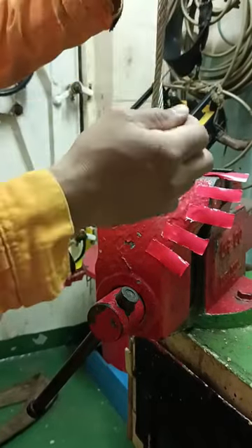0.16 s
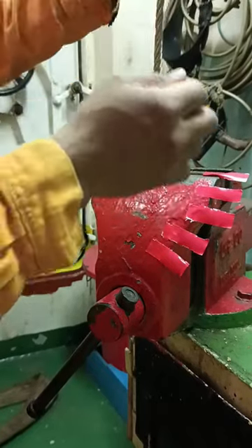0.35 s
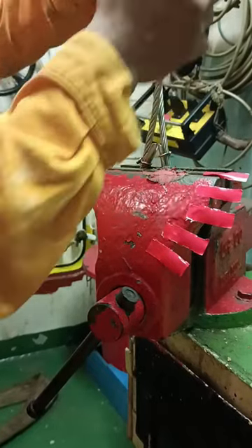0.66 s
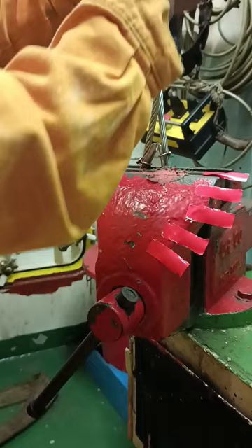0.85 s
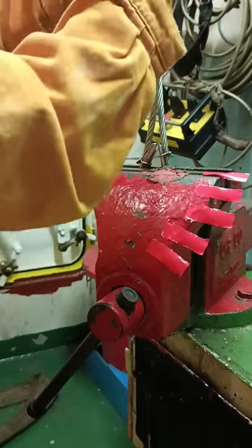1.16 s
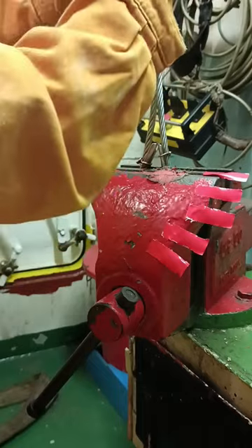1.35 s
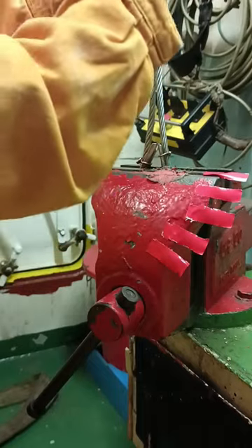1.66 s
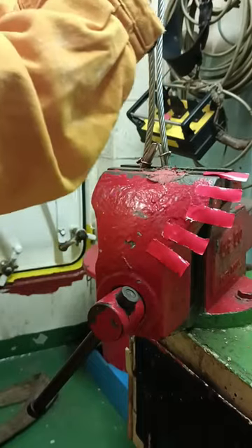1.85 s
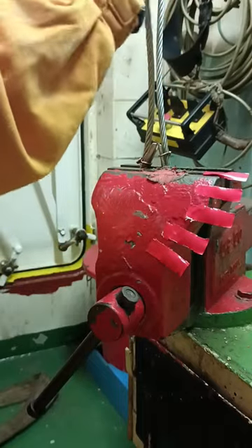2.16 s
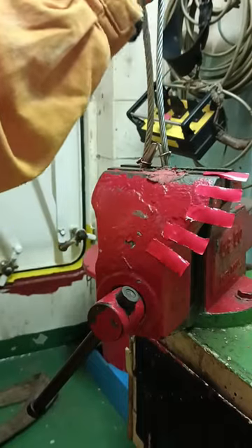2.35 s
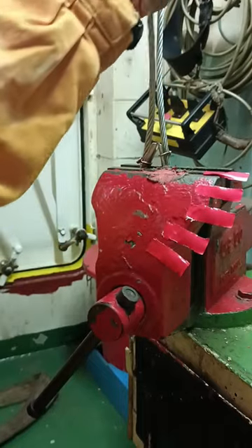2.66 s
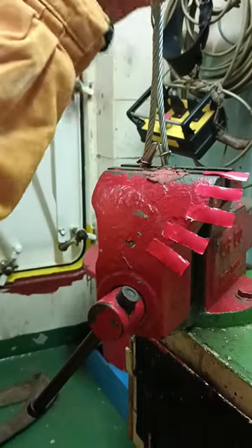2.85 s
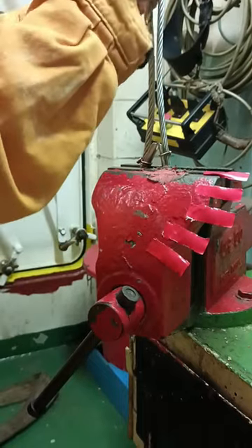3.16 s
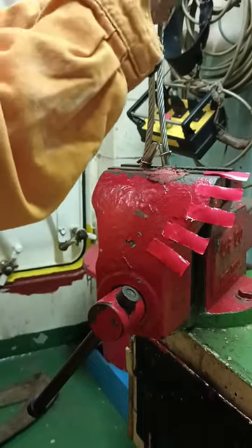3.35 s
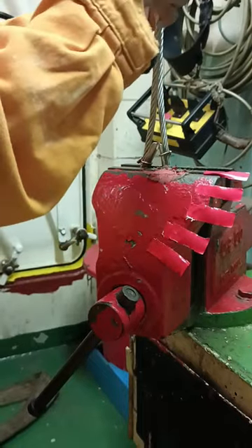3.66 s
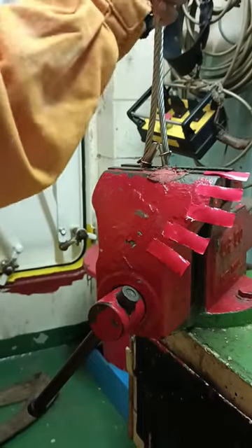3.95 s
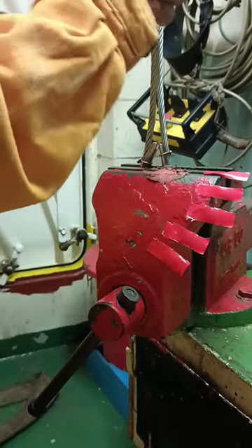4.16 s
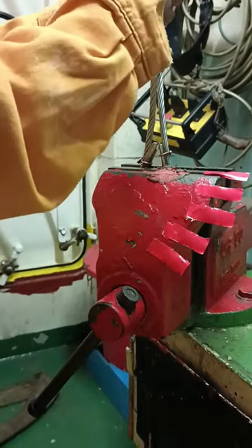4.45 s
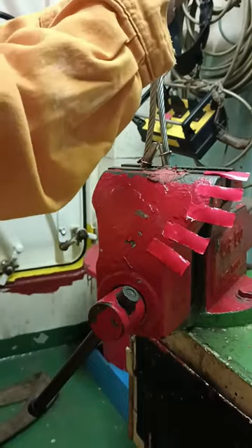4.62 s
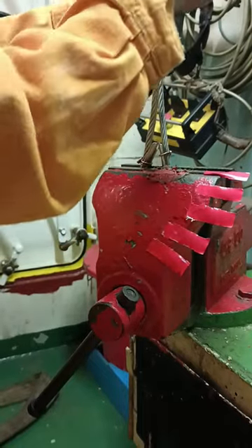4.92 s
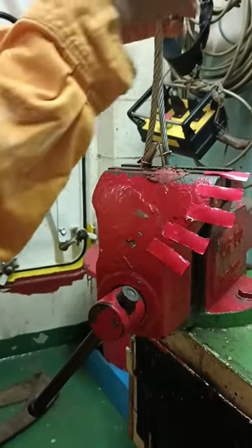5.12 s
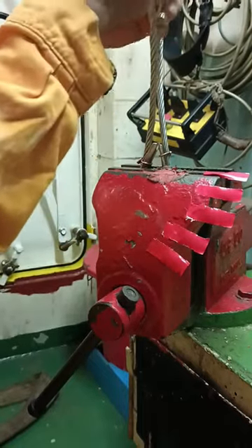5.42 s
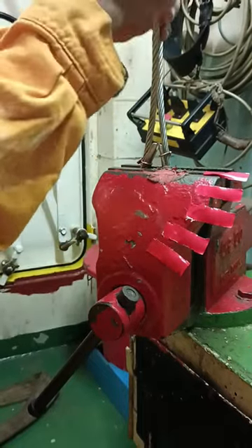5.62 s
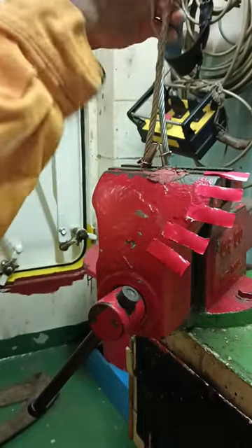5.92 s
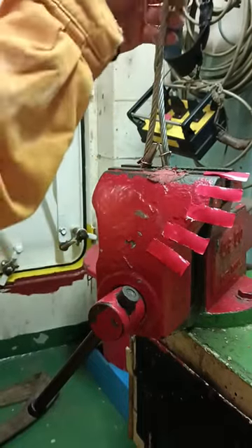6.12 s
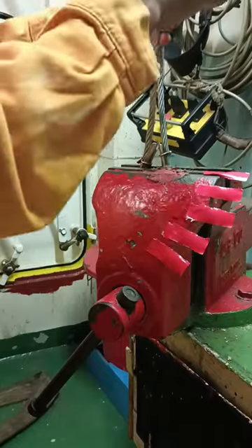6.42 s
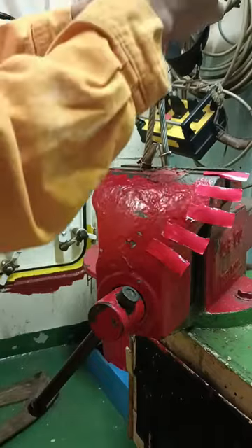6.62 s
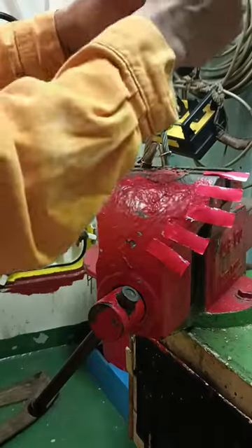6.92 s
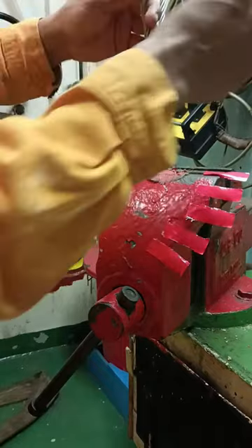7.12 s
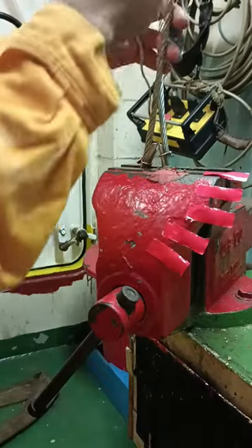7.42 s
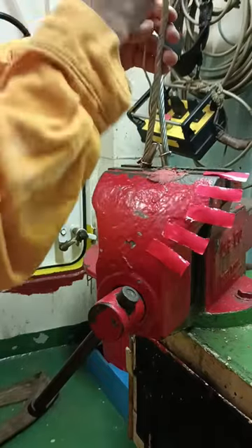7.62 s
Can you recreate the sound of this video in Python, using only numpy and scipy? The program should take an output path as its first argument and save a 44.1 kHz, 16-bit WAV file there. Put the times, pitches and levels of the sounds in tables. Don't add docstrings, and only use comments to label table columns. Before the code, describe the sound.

Inside a ship's engine room, deep hull rumble, low shaft and fan hums and a wide blower hiss run continuously. A thin high whistle swells briefly now and then. In the second half, a wire rope being handled gives a few sharp, bright ticks. Close stereo phone microphone near a steel bench.

```python
import sys
import numpy as np
from scipy import signal
from scipy.fft import rfft, irfft
from scipy.io import wavfile
from scipy.ndimage import uniform_filter1d

SR = 44100
rng = np.random.default_rng(int(sys.argv[2]) if len(sys.argv) > 2 else 0)


def undo_db(level):
    steps = np.asarray(level, float) / 20
    return 10 ** steps


def materialize(psi):
    bounded = np.clip(np.atleast_2d(psi).T, -1, 1)
    quanta = np.round(bounded * 32767).astype(np.int16)
    wavfile.write(sys.argv[1], SR, quanta)


N = 343098
HZ = np.arange(N // 2 + 1) * SR / N
TIME = np.arange(N) / SR


def over_hz(table, column=1):
    rows = np.array(table)
    return np.interp(np.log(HZ + 1), np.log(rows[:, 0]), rows[:, column])


def walk(span, count):
    k = max(int(span), 1)
    held = np.repeat(rng.standard_normal(count // k + 1), k)
    drift = uniform_filter1d(uniform_filter1d(held, k), k)[:count]
    return drift / np.std(drift)


def panned(x, pan_db):
    return x * undo_db(np.array([[pan_db], [-pan_db]]) / 2)


# [f/Hz, left minus right level/dB, right leads by phase/rad, likeness/0-1]
PORTS = [(20, 0.6, 0.04, 1), (45, 0.9, 0.02, 1), (110, 2.3, -0.01, 0.97), (158, 8.1, 0.5, 0.99),
         (190, 1.5, 1.67, 0.86), (215, -8.4, 0.61, 0.91), (300, -1.1, -0.01, 0.92), (380, 4.9, 0.09, 0.95),
         (435, 10.8, 0.79, 0.65), (500, 1.7, 2.27, 0.42), (590, -6.7, 0.88, 0.57), (680, -1.5, 0.59, 0.83),
         (760, 3.3, 1.48, 0.55), (870, -3.1, 1.47, 0.38), (1000, 4.3, 0.98, 0.5)]
# [f/Hz, left minus right level/dB]
PORTS_TREBLE = [(1200, -0.2), (1500, 0.8), (2300, -2.6), (3000, -1.6), (5000, -1.8), (7000, 0.7),
                (8300, -5.5), (9600, -9.0), (10450, -9.8), (10650, -12.6), (12000, -8.7), (13500, 1.2),
                (14200, -1.3), (15600, -20)]
TREBLE_LIKENESS, PORT_LAG_S, ROOM_SCATTER_RAD = .2, .0004, 1.1


def ports():
    edge_hz = PORTS[-1][0]
    pan_db = over_hz([row[:2] for row in PORTS] + list(PORTS_TREBLE))
    crossing, echoing = np.clip((HZ - edge_hz) / np.array([[350], [1200]]), 0, 1)
    scatter = ROOM_SCATTER_RAD * walk(40 * N / SR, count=len(HZ))
    lead = (1 - crossing) * over_hz(PORTS, column=2)
    lead = lead + crossing * 2 * np.pi * HZ * PORT_LAG_S + echoing * scatter
    alike = np.maximum(over_hz(PORTS, column=3) * (1 - echoing), TREBLE_LIKENESS)
    side = np.array([[.5], [-.5]])
    return undo_db(side * pan_db) * np.exp(-1j * side * lead), alike


def field(db_per_hz, gain, alike):
    shared, *diffuse = rfft(rng.standard_normal((3, N)))
    mix = np.sqrt(alike) * shared + np.sqrt(1 - alike) * np.array(diffuse)
    return irfft(mix * gain * undo_db(db_per_hz) * np.sqrt(SR / 2), N)


def humps(table):
    return sum(np.array([[left_db], [right_db]]) / (1 + (2 * (HZ - hz) / width) ** 2)
               for hz, width, left_db, right_db in table)


# [t/s, hiss level/dB]
LOAD = [
    (0, -0.1),
    (2.7, -0.4),
    (4.3, 0.46),
    (7.78, .5),
]


def blower_load():
    return np.interp(TIME, *np.transpose(LOAD))


# [f/Hz, level/dB per Hz]
RUMBLE = [(14, -76), (21, -48), (30, -45.5), (44, -46.5), (55, -43.5), (90, -47.5), (120, -48), (150, -45),
          (175, -48.5), (195, -55), (213, -53), (235, -57.5), (350, -61.5), (420, -65), (520, -74)]
# [f/Hz, width/Hz, left level/dB, right level/dB over the rumble]
PLATES = [(76, 8, 2.5, 2.5), (135.5, 6, 4, 4), (151, 5, 2.5, 2.5), (205, 8, 3, 3), (288, 8, 1.5, 1.5),
          (315, 10, 3, 3), (346, 6, 4, 4), (424, 10, 4, 4)]


def rumble(gain, alike):
    sway_db = .5 * walk(SR / 3, count=N)
    above_db = -36 * np.log2(np.maximum(HZ / RUMBLE[-1][0], 1))
    below_db = -30 * np.log2(np.maximum(RUMBLE[0][0] / (HZ + 1), 1))
    return field(over_hz(RUMBLE) + humps(PLATES) + above_db + below_db, gain, alike) * undo_db(sway_db)


def tone(hz, db, wander_hz):
    turns = np.cumsum(hz + wander_hz * walk(SR / 2, count=N)) / SR + rng.random()
    return np.sqrt(2) * undo_db(db) * np.sin(2 * np.pi * turns)


HUMS_HZ = [38.37, 166.9, 211.86]
HUMS_DB = [-24.5, -26.5, -35.5]
HUM_WANDER_HZ, SHAFT_SAG_DB_PER_DB = .03, -1.7


def main_hums(load_db):
    shaft, fan, pump = (tone(hz, db, HUM_WANDER_HZ) for hz, db in zip(HUMS_HZ, HUMS_DB))
    return shaft * undo_db(SHAFT_SAG_DB_PER_DB * load_db) + fan + pump


# [f/Hz, level/dB, wander/Hz, left minus right level/dB]
TONES = [(20.9, -41, .1, 0), (25.6, -45, .1, 0), (31, -37.5, .2, 0), (98.9, -42, .2, 0), (718, -60, 6, 0),
         (1324.3, -64, .5, -12), (1858, -64, 3, 3), (1931, -59.5, 1.5, 0), (2905, -63, 1.5, 0)]


def weak_tones():
    return sum(panned(tone(hz, db + 1.6 * walk(SR / 1.5, count=N), wander_hz), pan_db)
               for hz, db, wander_hz, pan_db in TONES)


# [leader f/Hz, partners [offset f/Hz, in step at t/s]]
TWINS = [(358.06, [(-.38, 2.0)]), (381.37, [(-.64, .82), (.35, 1.19)]), (1028.28, [(-.54, 1.1)])]
# [level/dB, left minus right level/dB]
TWIN_LEVELS = [
    [(-53, 1), (-59, 0.1)],
    [(-50.5, -1.1), (-51.5, .1), (-56.5, -4)],
    [(-59.5, -6), (-63.5, 8)],
]


def twins(hz, partners, levels):
    carrier = np.exp(2j * np.pi * (hz * TIME + rng.random()))
    slips = [np.ones(N)] + [np.exp(2j * np.pi * off_hz * (TIME - s)) for off_hz, s in partners]
    return sum(panned(np.sqrt(2) * undo_db(db) * (carrier * slip).imag, pan_db)
               for slip, (db, pan_db) in zip(slips, levels))


def gears():
    return sum(twins(hz, partners, levels) for (hz, partners), levels in zip(TWINS, TWIN_LEVELS))


BLOWER_SWELLS = [.85, 1.68, 2.62, 3.15, 3.95, 4.3, 4.7, 5.5, 6.0, 7.1]
BLOWER_HZ, BLOWER_WANDER_HZ, BLOWER_DB, BLOWER_PAN_DB = 4079.8, 1.6, -58.5, -5
FLUTTER_DB, FLUTTER_PER_S = 3, 11
SWELL_DB, SWELL_S = 10, 0.16


def blower():
    flutter_db = FLUTTER_DB * walk(SR / FLUTTER_PER_S, count=N)
    swell_db = SWELL_DB * sum(np.exp(-((TIME - s) / SWELL_S) ** 2) for s in BLOWER_SWELLS)
    whistle = tone(BLOWER_HZ, BLOWER_DB + flutter_db + swell_db, BLOWER_WANDER_HZ)
    return panned(whistle, BLOWER_PAN_DB)


def hums(load_db, gain):
    machines = main_hums(load_db) + weak_tones() + gears() + blower()
    return irfft(rfft(machines) * gain, N)


# [f/Hz, level/dB per Hz]
HISS = [(520, -73), (1300, -75.5), (2300, -74), (3000, -73), (5200, -74.0), (5600, -78), (6700, -80.5),
        (7200, -86), (9200, -81), (10400, -85), (12000, -89), (14000, -96.5), (14600, -93), (15300, -104),
        (15700, -104)]
# [f/Hz, width/Hz, left level/dB, right level/dB over the hiss]
DUCTS = [(570, 70, -1.6, -1.9), (735, 90, 3.9, 3.9), (820, 80, 2.5, 2.6), (1050, 80, 2.6, 5.2),
         (1130, 50, -3.5, 0.6), (1310, 90, 3.3, 1.2), (1870, 200, 6.1, 5.4), (2250, 300, -3.2, -3.2),
         (2450, 80, -2.6, -0.1), (2880, 250, 1.9, 2.3), (3240, 80, -2.0, -3.4), (3460, 70, -0.1, -1.7),
         (3800, 200, 2.7, 2.8), (4330, 70, -0.3, -0.2), (4520, 200, 1.3, -0.5), (5380, 100, -3.1, -0.1),
         (5880, 150, 1.9, 1.0), (7300, 300, -1.7, 0.9), (8000, 400, 3.4, 1.3), (8330, 200, -0.6, 3.4),
         (8900, 300, -0.2, -5.5), (9270, 200, -5.3, -4), (9560, 200, 1.2, 3.2), (10380, 160, 3.5, 4.1),
         (10720, 250, -3, -1.5), (12750, 200, 3.5, 1.5), (13230, 90, -3.6, -3.9), (13600, 200, 1.5, 3.7),
         (14150, 300, -0.8, -1.2), (14980, 200, 2.5, 4)]
# [f/Hz, width/Hz, left level/dB, right level/dB over the hiss]
WHISTLES = [(1787, 15, 2.6, 4.5), (1855, 20, 3.3, 0.2), (1930, 20, 3.3, 4.8), (2300, 25, 2.2, 4.3),
            (2774, 15, 4.7, -2.7), (2905, 15, 3.2, 1.9), (3350, 15, 7.2, 0.8), (3611, 15, 2.1, 4.6),
            (3853, 15, 3.5, -1.8), (3892, 15, -1.9, 3.8), (4080, 20, 3.2, 9.5), (4175, 15, 4.2, 3.9),
            (4450, 30, 5.0, 3.6), (4550, 15, 4.9, 0.8), (4589, 15, 5.8, -0.3), (4779, 15, 7.3, 1.2),
            (4975, 15, 2.2, 5.6), (5136, 15, 1.8, 4.4), (5190, 15, 0.9, 3.2), (6680, 30, 5.4, 1.1),
            (8744, 25, 2.9, 5.0), (9505, 25, -0.1, 3.8), (10320, 40, 4.1, 1.8), (10425, 30, 3.5, 3.3),
            (11370, 25, 5.5, 0.2), (11850, 25, 0.4, 5.0), (12206, 30, 4.8, 2.6), (12652, 25, 0.3, 4.3),
            (13890, 25, 7.2, 3.1), (14450, 40, 6.8, 9.6)]
ROOM_RIPPLE_DB, ROOM_RIPPLE_HZ = 1.2, 14


def hiss(load_db, gain, alike):
    ripple = [walk(ROOM_RIPPLE_HZ * N / SR, count=len(HZ)) for _ in range(2)]
    roll_off_db = -40 * np.log2(np.maximum(HISS[0][0] / (HZ + 1), 1))
    colour_db = over_hz(HISS) + humps(DUCTS) + humps(WHISTLES)
    colour_db = colour_db + ROOM_RIPPLE_DB * np.array(ripple) + roll_off_db
    top_share = 1 / (1 + (7000 / (HZ + 1)) ** 8)
    body = field(colour_db + 10 * np.log10(1 - top_share), gain, alike)
    body = body * undo_db(.15 * walk(SR / 6, count=N))
    top = field(colour_db + 10 * np.log10(top_share), gain, alike)
    top = top * undo_db(0.24 * walk(SR / 9, count=N))
    return undo_db(load_db) * (body + top)


# [t/s, peak level/dB]
TICKS = [
    (4.0885, -34),
    (5.8352, -29),
    (5.8454, -34),
    (5.8594, -30),
    (6.4253, -28),
    (6.4394, -33),
    (7.0818, -31),
    (7.0874, -34),
]
# [f/Hz, level/dB]
TICK_COLOUR = [(5000, -30), (8000, -7), (10500, 1), (13000, -1.5), (15500, -3)]
TICK_PAN_DB, TICK_T60_S = -9.5, .02


def wire():
    bursts = np.zeros((2, N))
    age = np.arange(4000) / SR
    for s, db in TICKS:
        i = int(s * SR)
        tail = rng.standard_normal((2, len(age))) * undo_db(-60 * age / TICK_T60_S)
        bursts[:, i:i + len(age)] += panned(tail * undo_db(db), TICK_PAN_DB)
    return irfft(rfft(bursts) * undo_db(over_hz(TICK_COLOUR) - 1.5), N)


def scene():
    load_db = blower_load()
    gain, alike = ports()
    return rumble(gain, alike) + hums(load_db, gain) + hiss(load_db, gain, alike) + wire()


def band_limit(x):
    return signal.sosfilt(signal.butter(12, 15760, fs=SR, output="sos"), x)


def record(dry):
    return band_limit(dry)


dry = scene()
out = record(dry)
materialize(out)
```